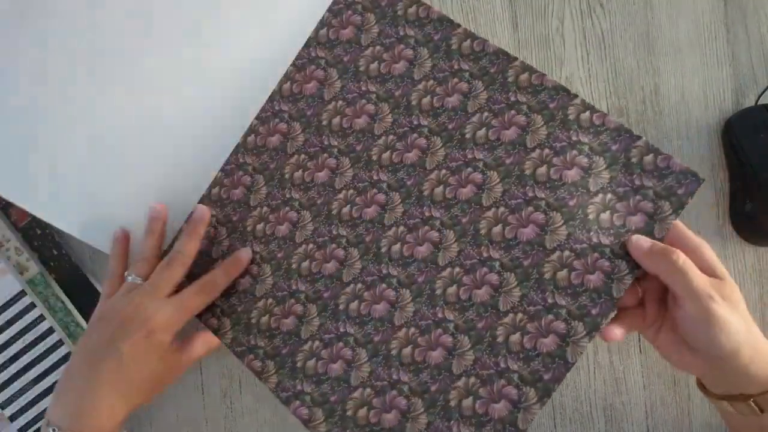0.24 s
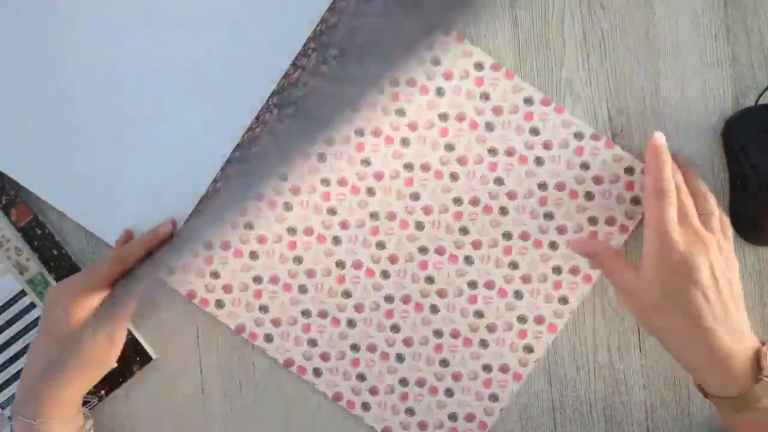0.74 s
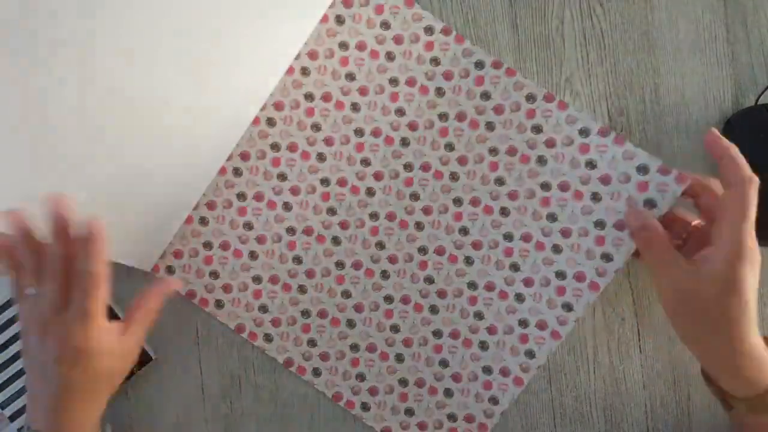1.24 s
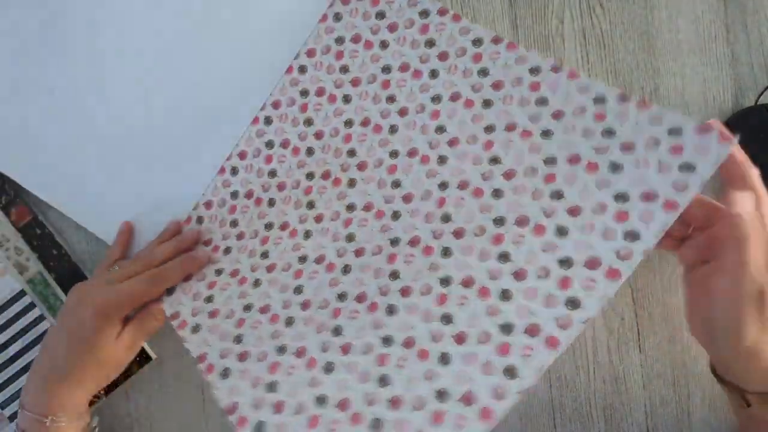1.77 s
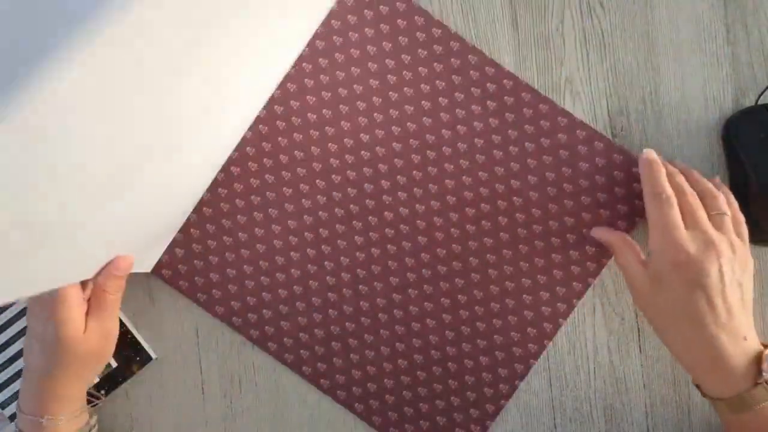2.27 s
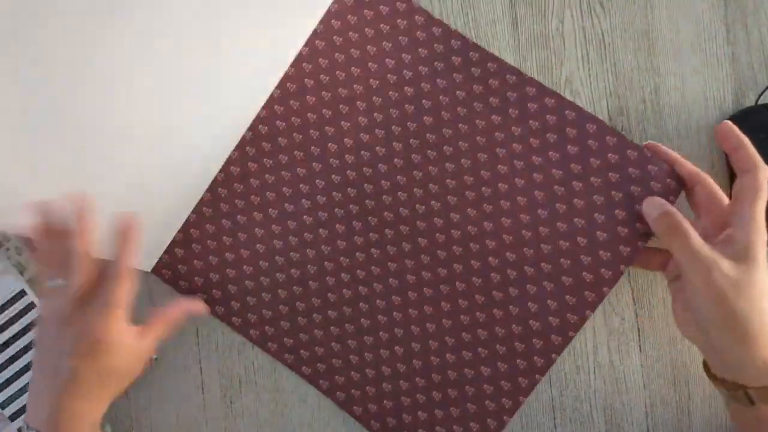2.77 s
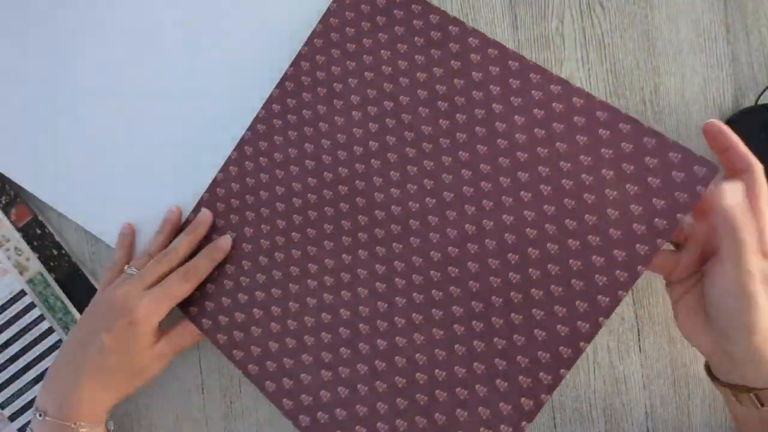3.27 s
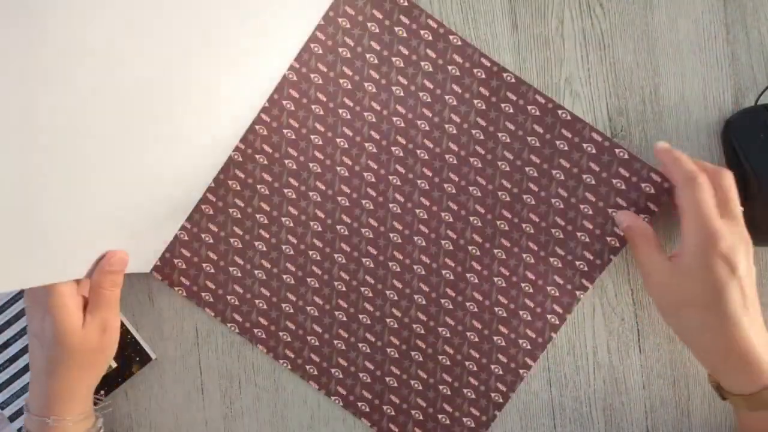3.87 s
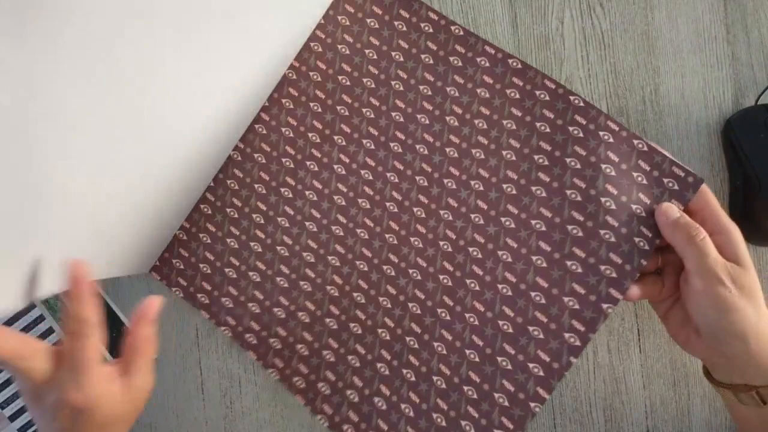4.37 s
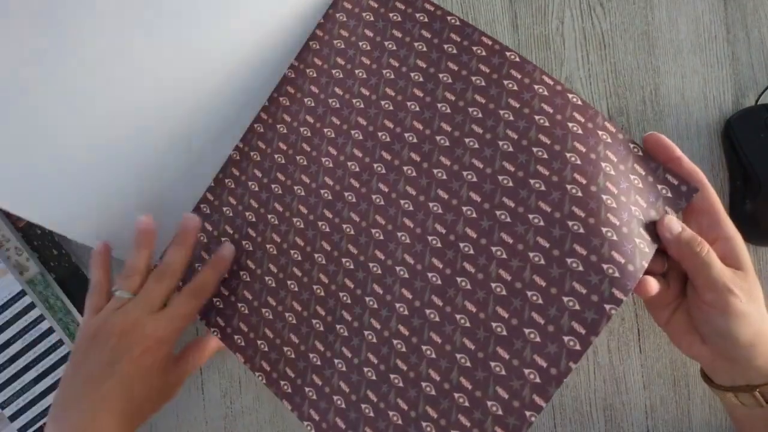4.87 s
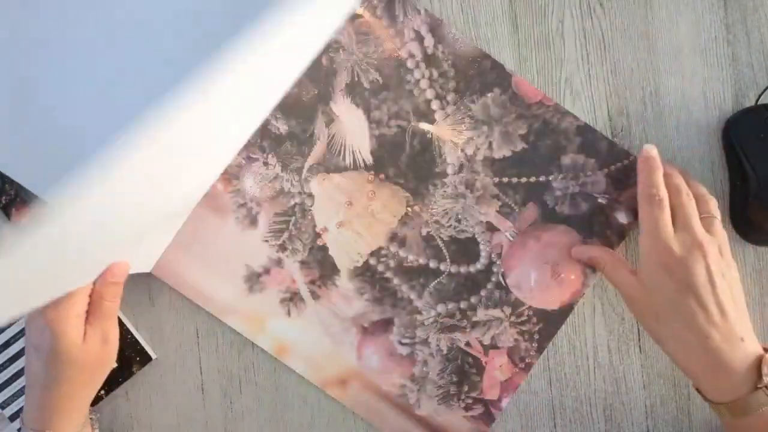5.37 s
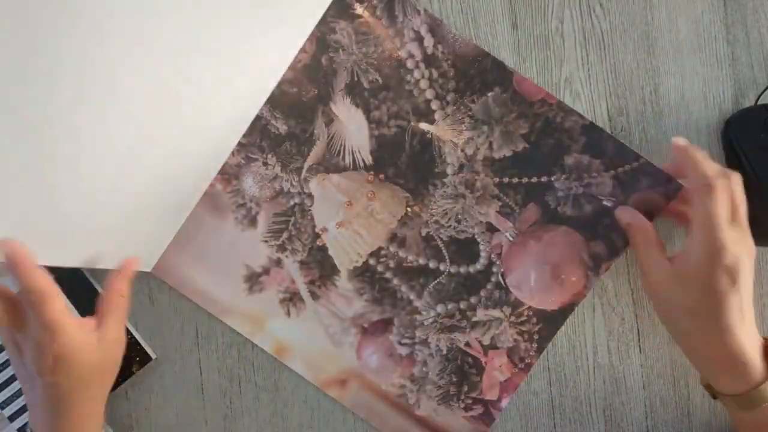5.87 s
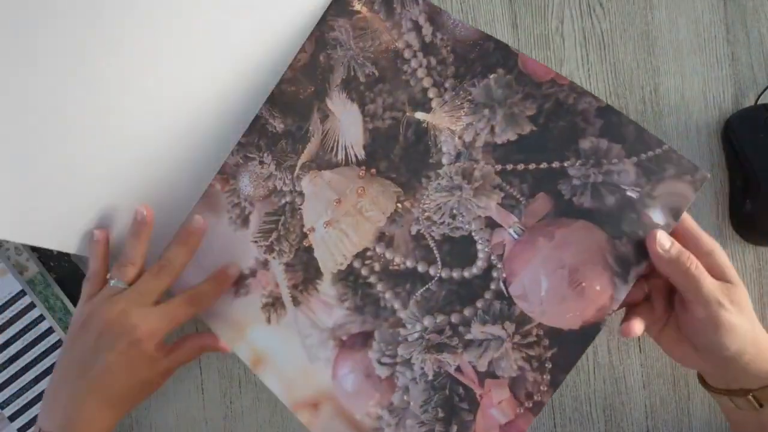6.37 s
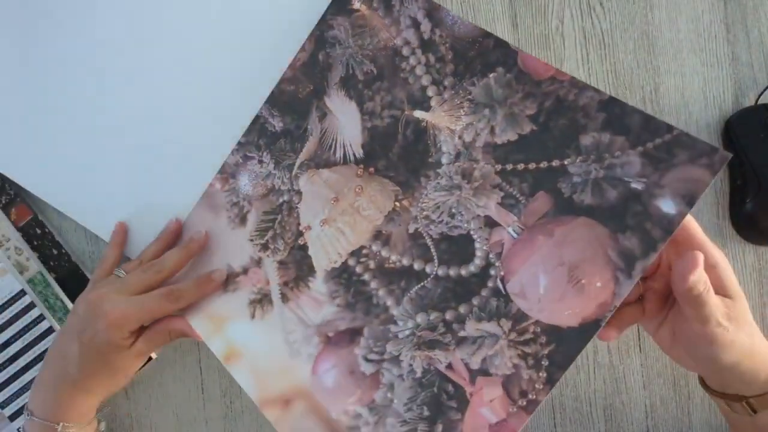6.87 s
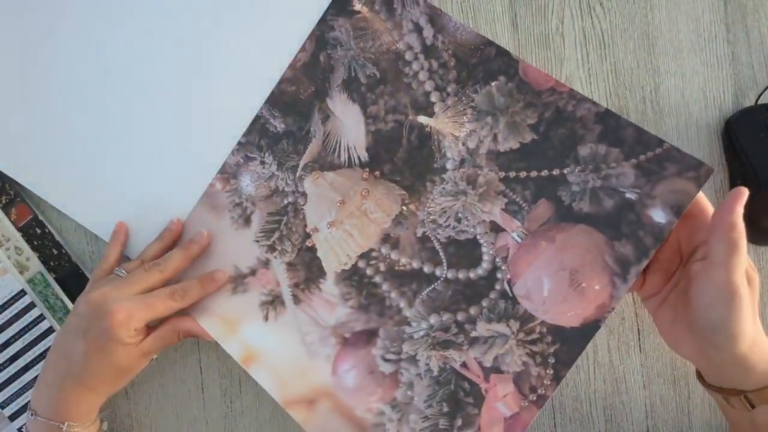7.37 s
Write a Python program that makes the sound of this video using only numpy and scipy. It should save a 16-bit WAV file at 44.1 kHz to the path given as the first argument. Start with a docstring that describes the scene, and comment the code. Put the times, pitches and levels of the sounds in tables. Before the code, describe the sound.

Dry swishes and light crackles of big thick pages being turned by hand, with sharp pops midway, over faint room noise.

```python
"""Large stiff paper sheets, turned by hand in a pad on a table in a quiet room.
Sliding fingers: dense random slips, coloured as hiss and as scrape of the pad.
Bent sheets: coloured grains wobble and thump; buckling pops are sums of decaying modes.
Edge flicks: short noise cracks. Pops and ticks get a short room tail.
Beneath: steady room noise and faint hum."""
import sys
import numpy as np
from scipy import signal
from scipy.io import wavfile
from scipy.ndimage import uniform_filter1d

SR = 44100
rng = np.random.default_rng(int(sys.argv[2]) if len(sys.argv) > 2 else 0)


def materialize(psi):
    """Save the field psi as 16-bit PCM at rate SR to the path in sys.argv[1].

    A 1-D psi becomes a single channel; in a 2-D psi each row is a channel.
    """
    bounded = np.clip(np.atleast_2d(psi).T, -1, 1)
    quanta = np.round(bounded * 32767).astype(np.int16)
    wavfile.write(sys.argv[1], SR, quanta)


N = 335590


def gain_of(db):
    """Decibels to gain."""
    return 10 ** (np.asarray(db) / 20)


def evened(x):
    """Scales to rms 1."""
    return x / np.sqrt(np.mean(x ** 2) + 1e-20)


def read_spectrum(points, hz):
    """Interpolates a spectrum table on a log-frequency axis."""
    point_hz, value = np.transpose(points)
    return np.interp(np.log(hz + 1), np.log(point_hz + 1), value)


def add(mix, start_s, sound):
    """Mixes a sound in at start_s."""
    part = mix[round(start_s * SR):][:len(sound)]
    part += sound[:len(part)]


def grains(per_s, spread_db):
    """Sparse slips of random sign; with spread, a few are large."""
    size = gain_of(spread_db * np.minimum(rng.exponential(1, N), 4))
    sign = rng.choice([-1., 1.], N)
    hit = rng.random(N) < per_s / SR
    return evened(size * sign * hit)


def shaped(x, shape_db, size, patchy_db):
    """Colours x by shape_db(hz, t), gain power 1 at each moment, with drifting random patches."""
    overlap = size * 3 // 4
    hz, t, z = signal.stft(x, SR, nperseg=size, noverlap=overlap)
    gain = gain_of(shape_db(hz[:, None], t) + 0 * t)
    gain /= np.sqrt((gain ** 2).mean(0))
    patches = rng.standard_normal(z.T.shape).T
    patches = uniform_filter1d(patches, size=5, axis=0)
    patches = evened(uniform_filter1d(patches, size=12, axis=1))
    coloured = z * gain * gain_of(patchy_db * patches)
    return evened(signal.istft(coloured, SR, nperseg=size, noverlap=overlap)[1][:N])


def flutter(hz, depth_db):
    """Quick random unevenness of pressure: low-passed noise as a dB gain."""
    wander = signal.lfilter(*signal.butter(2, hz, fs=SR), rng.standard_normal(N))
    return gain_of(depth_db * evened(wander))


def gestures(rows, rise_db_per_s, fall_db_per_s, linger_db, fade_db_per_s):
    """Power of each movement on a 1 ms grid: quick rise, swelling hold, quick fall, slower settling."""
    t = np.arange(0, N / SR, .001)
    start_s, length_s, db, swell_db = np.transpose(rows)[:4, :, None]
    since_s = t - start_s
    after_s = np.maximum(since_s - length_s, 0)
    progress = np.clip(since_s / abs(length_s), 0, 1)
    held_db = db + swell_db * (progress - .5) + rise_db_per_s * np.minimum(since_s, 0)
    # doubled dB: gain_of then yields power
    fall = gain_of(-2 * fall_db_per_s * after_s)
    settling = gain_of(2 * (linger_db - fade_db_per_s * after_s))
    return t, gain_of(2 * held_db) * (fall + settling) + 1e-30


def summed(t, at, power, db=0):
    """Gain of all movements together, each shifted by its own dB."""
    weight = gain_of(2 * np.reshape(db, (-1, 1)))
    return np.interp(t, at, np.sqrt((power * weight).sum(0)))


def blended(t, at, power, values):
    """Power-weighted mean of a property: the loudest movement counts most."""
    return np.interp(t, at, values @ power / power.sum(0))


def duck_before(events, t, dip_db, lead_s):
    """Rustle gain: dips briefly just before each event, so that its attack stands out sharply."""
    coarse_t = t[::32]
    ahead_s = np.array(events)[:, :1] - coarse_t
    dip = (np.clip(1 - ahead_s / lead_s, 0, 1) * (ahead_s > 0)).max(0)
    return gain_of(-dip_db * np.interp(t, coarse_t, dip))


# fingers and sheets sliding: (start [s], length [s], mid-stroke hiss level [dB],
#   swell over stroke [dB], top-end brightness [dB], pad scrape re hiss level [dB])
SLIDE_STROKES = [(0.0, 0.18, -48, 1, 3.5, -8), (0.192, 0.1, -58, 6, -7, 4),
                 (0.321, 0.27, -55.5, 5.5, -4, -1.4), (0.738, 0.027, -54.5, -7, 0.6, -14),
                 (0.89, 0.077, -65.5, 0.8, 3.6, -8), (1.075, 0.06, -55.5, 9.5, 2.2, -13.4),
                 (1.181, 0.058, -56, 6.5, -10, 2), (1.28, 0.13, -52, -10, 3, -4.0),
                 (1.392, 0.023, -64, -7, -4, 8.5), (1.428, 0.062, -51.5, -7, -1.2, 2),
                 (1.498, 0.18, -54, -8.5, -5, -1.5), (1.68, 0.03, -50.5, 1.5, -1.5, -0.5),
                 (1.817, 0.081, -64, -2, -8, -0.5), (2.064, 0.084, -66, 7.5, 2.5, -6),
                 (2.171, 0.13, -58, 7, 1.5, -10.3), (2.452, 0.034, -62.9, -7, -6, 1),
                 (2.509, 0.072, -58.5, 5, 0, 5), (2.62, 0.072, -54.5, 9, -2.9, 1.8),
                 (2.728, 0.067, -64.5, -6.5, -10, 7), (2.867, 0.01, -61.5, -13, -0.5, 8.5),
                 (2.918, 0.082, -59.5, 5, -1.5, -1.5), (2.97, 0.06, -65, 0, -4, 13),
                 (3.063, 0.064, -60.5, 13, -13, 4), (3.227, 0.036, -64.5, 4, -5, 5),
                 (3.299, 0.016, -58.5, 12.8, -3, -7), (3.4, 0.35, -66.5, 3, -1.5, -5.5),
                 (3.925, 0.038, -58, -1, -7.5, -1.1), (4, 0.16, -57.5, -12, 3.0, 0),
                 (4.126, 0.11, -57, 1, 1.2, 0.5), (4.261, 0.026, -53.5, 4, -4.5, 0.5),
                 (4.337, 0.068, -46, 0.5, -1.0, 0), (4.441, 0.052, -49.5, 3.2, -1.5, 1),
                 (4.54, 0.21, -64.0, -4, -19, 7), (4.802, 0.102, -64, 0, -4, 3),
                 (4.894, 0.12, -55.5, 16.5, -6.8, 2.3), (5.087, 0.072, -64.9, -16.5, -11, -4),
                 (5.43, 0.024, -67.8, -23, 7, -22), (5.66, 0.078, -58, 0, 1.4, -5.5),
                 (5.884, 0.0087, -61, -6.1, -3.5, 6.5), (5.917, 0.034, -56.5, -2.5, -10, 6.5),
                 (5.973, 0.11, -50.5, -1, 0.5, 2.5), (6.09, 0.18, -49.5, 2.5, 1.5, -7),
                 (6.386, 0.072, -49, -10, -0.8, 0.5), (6.493, 0.019, -62, -4, -5, -3),
                 (6.555, 0.13, -69, 0.5, -15, 10), (6.643, 0.067, -64.6, 8.3, -9, -4),
                 (6.725, 0.18, -67.5, -11.5, -6, 1.5), (7.066, 0.076, -73.5, -1.5, -10, 4.5)]
# hiss colour: (frequency [Hz], relative level [dB])
HISS_SPECTRUM = [(2500, -12.5), (3500, -9.5), (7000, -8), (7700, -6.5), (9200, -12), (12500, -8.5),
                 (14700, -6), (16000, -12.5)]
# pad resonances under the scrape: (centre [Hz], width [Hz], relative level [dB])
PAD_RESONANCES = [(2003, 460, 7.5), (2436, 440, 3.5), (2800, 600, 0), (1290, 980, 3.5)]


def slide(t):
    """Fine fibre slips hiss, with a brightness per stroke, and excite the resonant pad beneath."""
    at, power = gestures(SLIDE_STROKES, rise_db_per_s=800, fall_db_per_s=498.5,
                         linger_db=-11, fade_db_per_s=37)
    bright_db, scrape_db = np.transpose(SLIDE_STROKES)[4:]

    def hiss_db(hz, s):
        top_end = np.clip((hz - 6000) / 5000, 0, 1)
        return read_spectrum(HISS_SPECTRUM, hz) + blended(s, at, power, bright_db) * top_end

    def pad_db(hz, s):
        peaks = sum(gain_of(db) / (1 + (2 * (hz - centre_hz) / width_hz) ** 2) ** 0.78
                    for centre_hz, width_hz, db in PAD_RESONANCES)
        return 20 * np.log10(peaks)

    pressure = flutter(35, depth_db=1.5)
    hiss = shaped(grains(14000, spread_db=0.0), hiss_db, size=256, patchy_db=1.5)
    scrape = shaped(grains(1800, spread_db=1.5), pad_db, size=512, patchy_db=4.5)
    return pressure * summed(t, at, power) * hiss + summed(t, at, power, scrape_db) * scrape


# sheet bent or flapping: (start [s], length [s], mid-flex wobble level [dB],
#   swell over flex [dB], low thump re wobble [dB], stiffness as centre frequency [Hz])
SHEET_FLEXES = [(0, 0.023, -62, -1, 6, 543), (0.055, 0.063, -57, 15.5, 4.5, 408),
                (0.182, 0.011, -46.5, -5, -11, 518), (0.279, 0.02, -46.5, 0.5, -2.8, 430.0),
                (0.346, 0.017, -41, -7, -12.1, 660.0), (0.384, 0.035, -44, 2.5, 0, 459),
                (0.495, 0.077, -45, -2.5, -3.5, 480.0), (0.709, 0.029, -65.5, 8, 6, 499),
                (0.837, 0.012, -72.5, -7.5, 14, 800), (1.099, 0.21, -69, 12, 6.5, 594),
                (1.393, 0.089, -58.5, 8.5, 0.3, 720.0), (1.507, 0.054, -43.5, 7, -1, 512),
                (1.715, 0.069, -48.5, 7.5, -1, 541), (2.454, 0.07, -69, -5.5, 3.8, 730),
                (2.572, 0.0068, -60.5, 4.5, -1, 740.0), (2.686, 0.089, -69, -0.5, -4, 740.0),
                (2.869, 0.033, -47, -7, -4, 484.4), (2.988, 0.041, -57.9, 0.7, -11.5, 790.0),
                (3.117, 0.128, -53, -13.5, 1, 544), (3.353, 0.047, -50, -5.5, 1.5, 410.0),
                (3.5, 0.12, -67.5, -5, 8, 525), (3.695, 0.014, -73.3, -2.5, 13, 456.5),
                (3.98, 0.15, -64, -7, 2.7, 642), (4.125, 0.088, -60, 9.5, -6.5, 800),
                (4.265, 0.031, -38, 12, 3, 438), (4.367, 0.02, -45.5, 0.5, 3, 483),
                (4.406, 0.03, -26.5, -9.5, -2, 1000), (4.47, 0.0077, -33.5, -0.5, 1, 428),
                (4.553, 0.035, -37, 1.5, 0.1, 400.0), (4.682, 0.051, -49.5, 3, 8.5, 355),
                (4.849, 0.053, -49.5, 4.5, -3.5, 580.0), (4.943, 0.082, -53.5, 13.5, -4.5, 538.4),
                (5.094, 0.11, -33.5, -18, -8, 580.0), (5.177, 0.025, -47, -4, -16.5, 520.0),
                (5.305, 0.012, -72, 3.5, 6, 803), (5.677, 0.15, -69, -11.5, 4, 460.0),
                (5.883, 0.036, -51, 14.3, 7.5, 330.0), (5.97, 0.095, -45.5, -3.5, 3.5, 404),
                (6.094, 0.11, -42.5, -9, 8.5, 351), (6.259, 0.017, -54, 0.2, -9, 560.0),
                (6.394, 0.072, -44.5, 1, 1, 520.0), (6.559, 0.12, -63, 1, 2, 580.0),
                (6.678, 0.031, -62.5, 8.5, 4.5, 730.0), (6.757, 0.093, -56.5, 3.7, -7, 450.0),
                (7.065, 0.067, -65, -4, -14, 530.0)]
# thump colour: (frequency [Hz], relative level [dB])
THUMP_SPECTRUM = [(15, -31.5), (25, -3), (65, -1), (130, -5.5), (178, -2), (221, -7.5), (369, -10),
                  (400, -15.5), (520, -28.5), (880, -120)]


def bend(t):
    """Small buckles wobble around the sheet's stiffness pitch; its air load thumps below."""
    at, power = gestures(SHEET_FLEXES, rise_db_per_s=547.5, fall_db_per_s=209.5,
                         linger_db=-9, fade_db_per_s=74.5)
    thump_db, stiff_hz = np.transpose(SHEET_FLEXES)[4:]

    def wobble_db(hz, s):
        octaves = np.log2((hz + 1) / blended(s, at, power, stiff_hz))
        level_db = 20 * np.log10(summed(s, at, power))
        upper_db_per_oct = np.clip(7 - 0.25 * (level_db + 25), 3, 18)  # hard bending spreads upward
        hump = -np.where(octaves > 0, upper_db_per_oct, 9) * abs(octaves)
        top_cut = 40 * np.clip(np.log2((hz + 1) / 2100), 0, 3)
        low_cut = 30 * np.clip(np.log2(230 / (hz + 1)), 0, 3)
        return hump - top_cut - low_cut

    wobble = shaped(grains(2600, spread_db=0.2), wobble_db, size=512, patchy_db=3.0)
    thump = shaped(grains(900, spread_db=1.5), lambda hz, s: read_spectrum(THUMP_SPECTRUM, hz),
                   size=2048, patchy_db=3.6)
    pressure = flutter(25, depth_db=1.05)
    return summed(t, at, power) * pressure * wobble + summed(t, at, power, thump_db) * thump


# room noise colour: (frequency [Hz], relative level [dB])
AIR_SPECTRUM = [(15, -42.5), (25, -7.5), (120, -2), (373, -13), (427, -6.5), (641, -19), (734, -13.5),
                (2280, -21.5), (3920, -26), (7710, -27), (9570, -33), (14800, -36), (16000, -22.5)]
# hum partials: (frequency [Hz], level [dB rms])
HUM_PARTIALS = [(100, -74), (199, -74), (490, -80), (645, -77)]


def air(t):
    """Steady room noise: coloured noise plus faint constant hum sines."""
    noise_db = -62
    noise = shaped(rng.standard_normal(N), lambda hz, s: read_spectrum(AIR_SPECTRUM, hz),
                   size=2048, patchy_db=2.0)
    hum = sum(np.sqrt(2) * gain_of(db) * np.sin(2 * np.pi * hz * t) for hz, db in HUM_PARTIALS)
    return gain_of(noise_db) * noise + hum


# flicks of an edge or nail: (time [s], crack level [dB],
#   dull part re crack [dB], before a common lift)
EDGE_TICKS = [(0.178, -39.5, 7.5), (0.335, -25.5, 1.5), (0.4024, -41.5, 12.5), (0.4996, -34.5, 8.5),
              (0.833, -40, -32), (1.2025, -42, 9.5), (1.279, -37, 10), (1.5054, -31.5, 9.5),
              (2.5748, -38.5, -5), (2.6863, -29, -1), (2.843, -35.5, 3.5), (2.8593, -35.5, -8),
              (4.396, -30.5, 11), (5.01, -30, -8), (5.0923, -37, 2), (5.9692, -42.5, 16.5),
              (6.085, -31, -9), (6.8398, -43, 10)]


def ticks():
    """Wide-band noise crack, 60 dB down in about 14 ms, split into a bright and a dull part."""
    t60_s, attack_s, dull_lift_db = 0.014, 0.00097, 3.5
    bright, dull, t = np.zeros(N), np.zeros(N), np.arange(2000) / SR
    noises = rng.standard_normal((len(EDGE_TICKS), len(t)))
    for (start_s, db, dull_db), noise in zip(EDGE_TICKS, noises):
        crack = gain_of(db - 60 * t / t60_s) * noise * (1 - np.exp(-t / attack_s))
        add(bright, start_s, crack)
        add(dull, start_s, gain_of(dull_db + dull_lift_db) * crack)
    high = signal.butter(3, 3500, "high", fs=SR)
    mid = signal.butter(2, [1400, 3400], "band", fs=SR)
    return signal.lfilter(*high, bright) + signal.lfilter(*mid, dull)


# buckling pops: (time [s], level [dB], pitch [Hz], t60 at the pitch [s],
#   crease sharpness re level [dB])
BUCKLE_POPS = [(0.179, -28.5, 620, 0.042, 1), (0.278, -26, 407, 0.044, -19),
               (0.3351, -12, 640, 0.024, -2.5), (0.385, -31, 570, 0.032, -10),
               (0.417, -22.5, 430, 0.06, -24), (0.491, -24.5, 566, 0.089, -17),
               (0.832, -39.5, 1190, 0.024, -4), (1.276, -48, 1760, 0.058, 1), (1.503, -33, 657, 0.058, -4),
               (1.763, -28, 568, 0.036, -3), (2.51, -40, 1986, 0.062, -22), (2.579, -40.5, 607, 0.065, -15),
               (2.69, -35.5, 1452, 0.045, -24), (2.843, -40, 1420, 0.05, -6), (2.86, -30, 574, 0.13, 0.5),
               (3.139, -26.5, 670, 0.045, -31), (3.172, -26.5, 450, 0.035, -17),
               (3.206, -35.5, 570, 0.046, -26), (3.236, -37, 684, 0.061, -14),
               (3.348, -29.5, 348, 0.05, -28), (3.358, -25, 295, 0.038, -36), (3.981, -49, 974, 0.05, 7),
               (4.3, -14.5, 400, 0.027, -14), (4.358, -15.5, 480, 0.032, -6),
               (4.388, -15.5, 403.3, 0.13, -2.5), (4.395, 3.5, 1114, 0.027, -10.5),
               (4.406, 4.5, 1035, 0.017, -9.5), (4.423, -12.5, 711, 0.067, -9.5),
               (4.472, -12, 425, 0.048, -6), (4.589, -17.5, 296, 0.064, -18), (4.897, -35, 565, 0.044, -17),
               (5.073, -14.5, 670, 0.061, -6), (5.082, -10, 478, 0.04, -14), (5.1, -2, 630, 0.029, -4.5),
               (5.117, -4.5, 510, 0.017, -29), (5.169, -18, 554, 0.046, -23), (5.966, -28, 300, 0.062, -6),
               (5.99, -29, 283, 0.093, 7.5), (6.093, -19, 328, 0.045, -1), (6.251, -43, 400, 0.05, 11),
               (6.395, -29, 336, 0.06, -8), (6.444, -22.5, 700, 0.06, -30), (6.707, -48, 604, 0.05, 7),
               (6.838, -37, 421, 0.068, -1), (7.076, -56, 403, 0.054, -1)]
# modes of a buckle: (multiple of its pitch [ratio], level [dB])
BUCKLE_MODES = [(1, -5), (.55, -17), (.78, -14), (1.25, -14.5), (1.6, -15)]
# modes of the sharp crease: (frequency [Hz], level before sharpness [dB])
CREASE_MODES = [(1050, -7.5), (1480, -13), (2050, -11), (2900, -26)]


def pops():
    """Each snap rings sheet modes around its pitch and crease modes; the higher ones die first."""
    attack_s, detune = 0.00098, 0.055
    out, t = np.zeros(N), np.arange(6000) / SR
    spreads = rng.uniform(-1.2, 1, (len(BUCKLE_POPS), len(BUCKLE_MODES) + len(CREASE_MODES)))
    for (start_s, db, pitch_hz, t60_s, crease_db), spread in zip(BUCKLE_POPS, spreads):
        modes = [(pitch_hz * ratio, mode_db) for ratio, mode_db in BUCKLE_MODES]
        modes += [(hz, mode_db + crease_db) for hz, mode_db in CREASE_MODES]
        ring = np.zeros(len(t))
        for (hz, mode_db), offset in zip(modes, spread):
            decay_db = 60 * t * hz / pitch_hz / max(t60_s, .01)
            ring += gain_of(mode_db - decay_db) * np.sin(2 * np.pi * hz * (1 + detune * offset) * t)
        add(out, start_s, gain_of(db) * ring * (1 - np.exp(-(t / attack_s) ** 2)))
    return out


# room decay: (frequency [Hz], t60 [s])
ROOM_T60 = [(200, 0.44), (1000, 0.25), (4000, 0.11), (12000, 0.043)]


def room(x):
    """Sparse reflections of random sign, each band dying at its own speed."""
    taps = np.zeros(SR // 2)
    at = np.arange(150, len(taps) - 20, 20)
    taps[at + rng.integers(0, 20, len(at))] = rng.choice([-1., 1.], len(at))
    hz, t, z = signal.stft(taps, SR, nperseg=256)
    decay = gain_of(-60 * t / read_spectrum(ROOM_T60, hz)[:, None])
    tail = signal.istft(z * decay, SR, nperseg=256)[1]
    return signal.fftconvolve(x, tail / np.linalg.norm(tail))[:N]


def scene():
    """Mixes all sources; only the sharp sounds leave a short room tail."""
    t = np.arange(N) / SR
    rustle = duck_before(EDGE_TICKS, t, dip_db=2.5, lead_s=0.011) * slide(t)
    rustle += duck_before(BUCKLE_POPS, t, dip_db=5.5, lead_s=0.039) * bend(t)
    sharp = pops() + ticks()
    tail_db = -12.5
    return (rustle + sharp + gain_of(tail_db) * room(sharp) + air(t))[None]


def record(dry):
    """The small microphone loses the deep bass; then the band limit."""
    edge_hz = 15780
    lean = signal.lfilter(*signal.butter(3, 48, "high", fs=SR), dry)
    band_limit = signal.firwin(1023, edge_hz, window=("kaiser", 9), fs=SR)
    return signal.oaconvolve(lean, band_limit[None], "same")


dry = scene()
out = record(dry)
materialize(out)
```